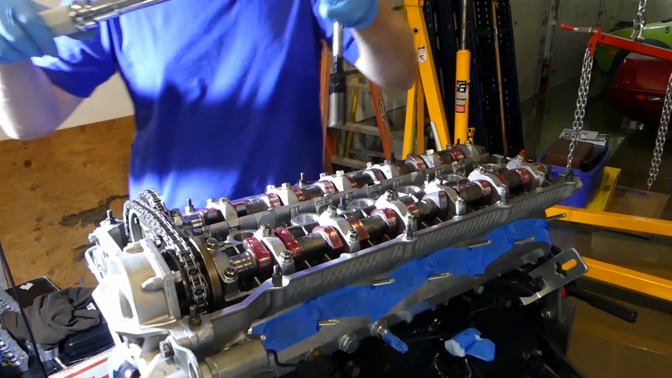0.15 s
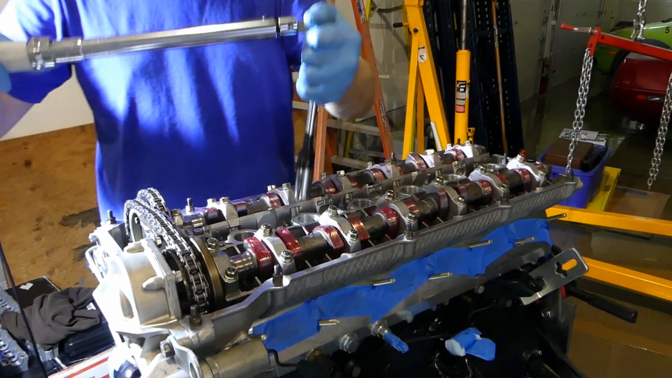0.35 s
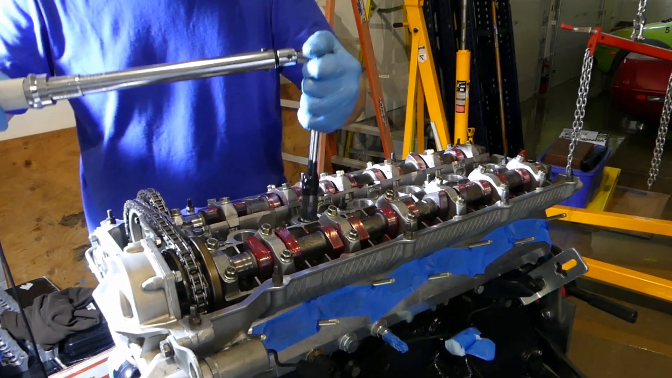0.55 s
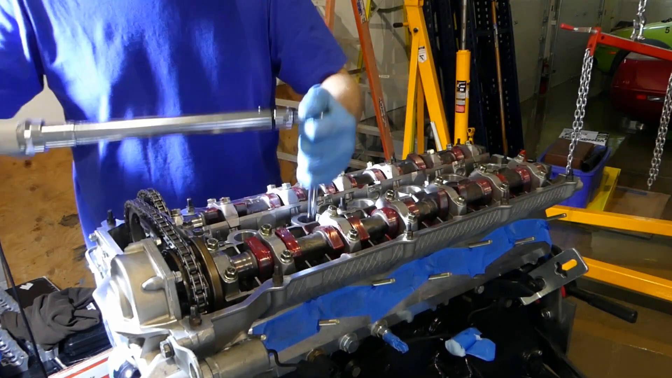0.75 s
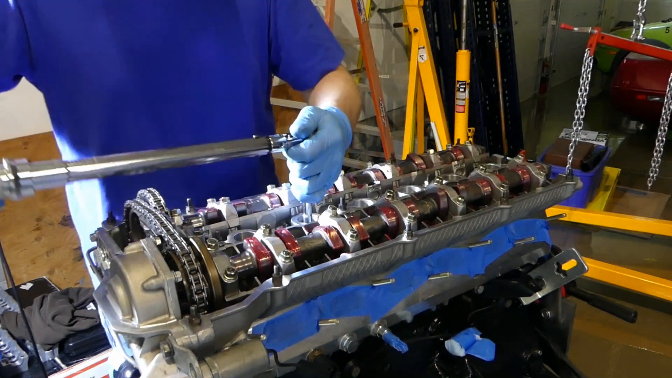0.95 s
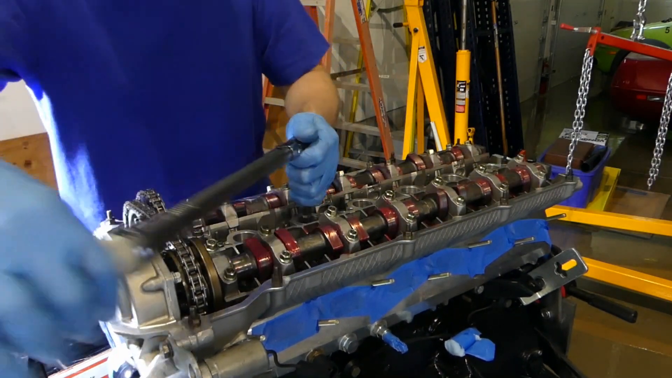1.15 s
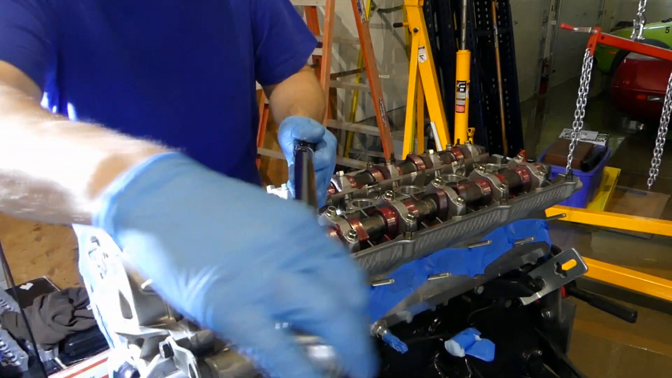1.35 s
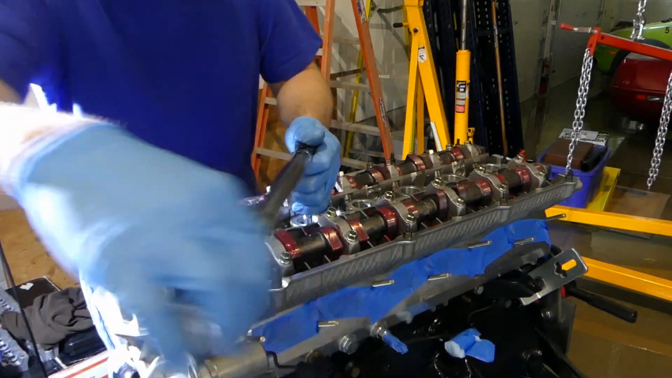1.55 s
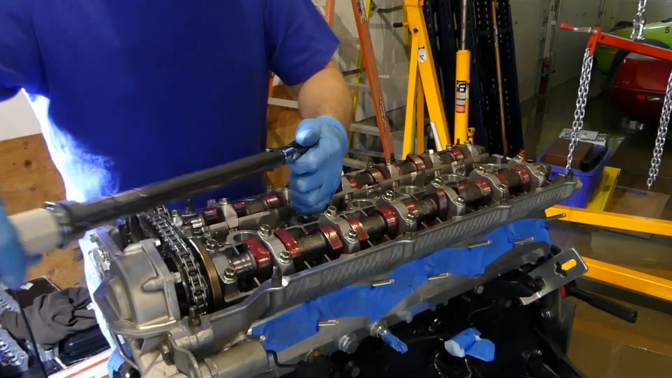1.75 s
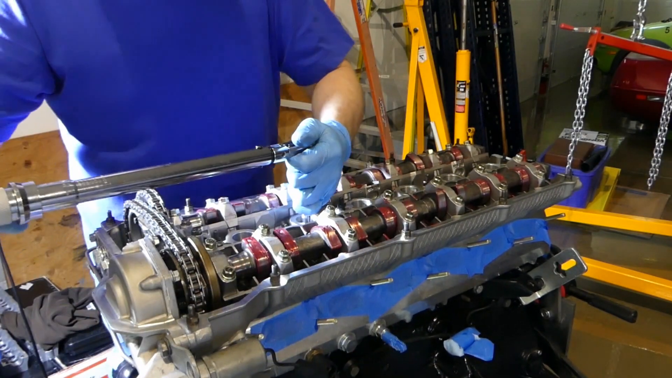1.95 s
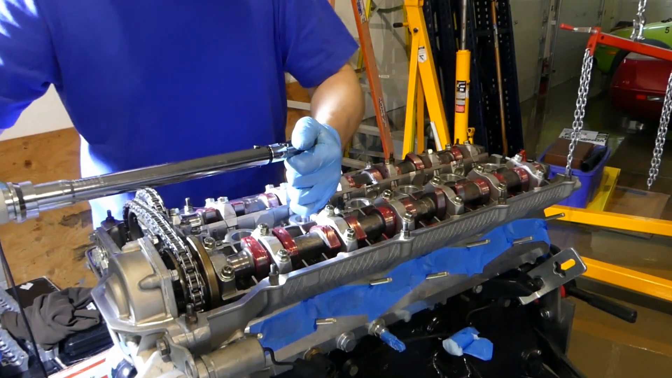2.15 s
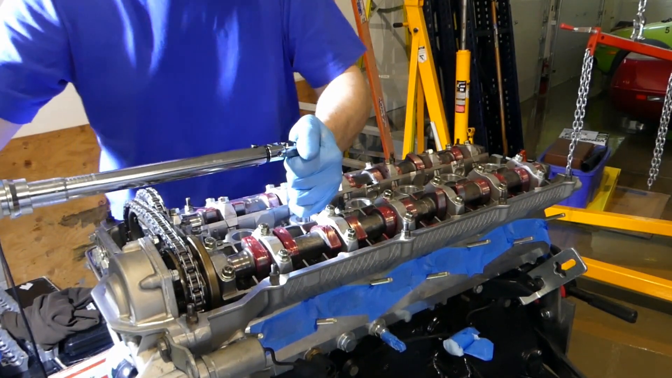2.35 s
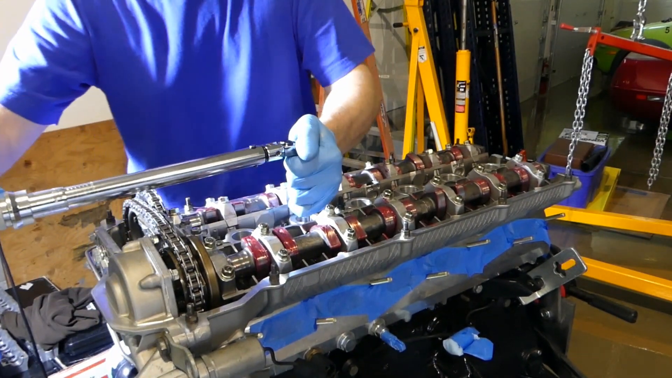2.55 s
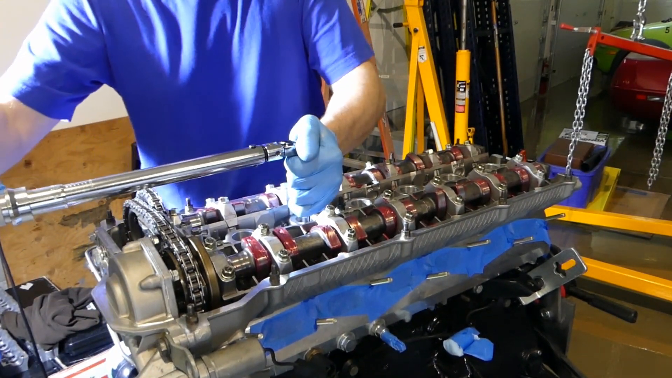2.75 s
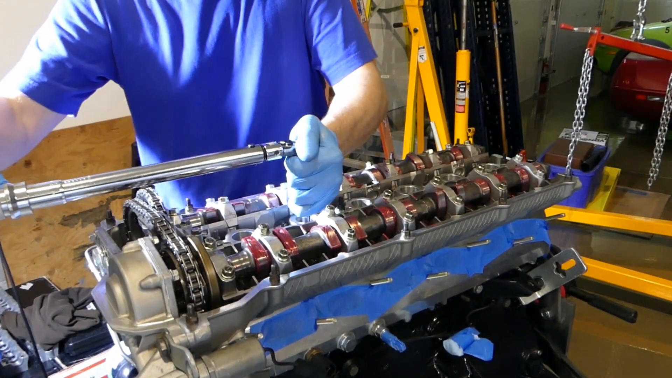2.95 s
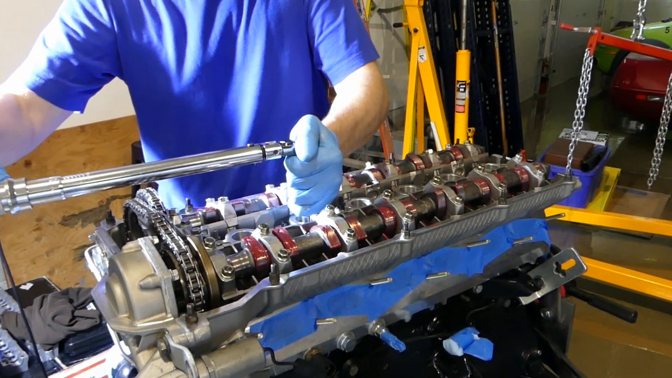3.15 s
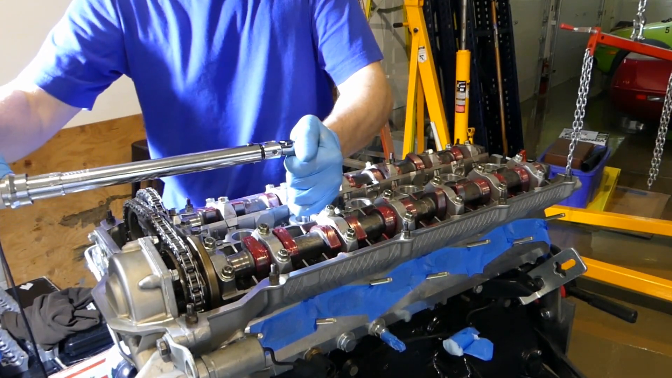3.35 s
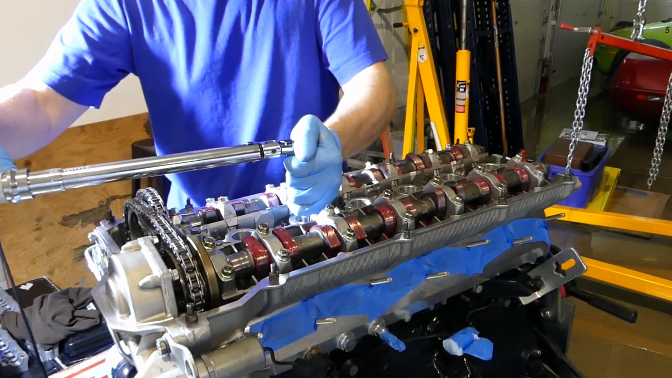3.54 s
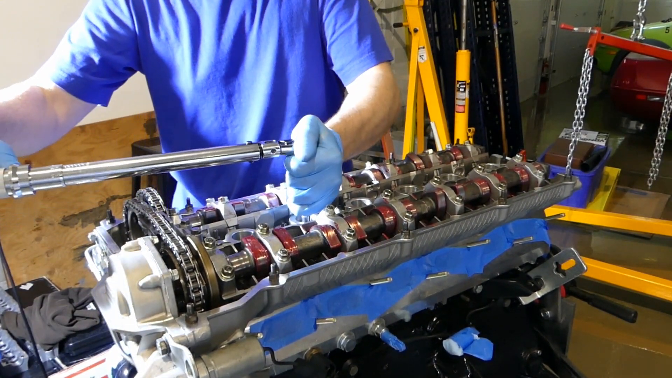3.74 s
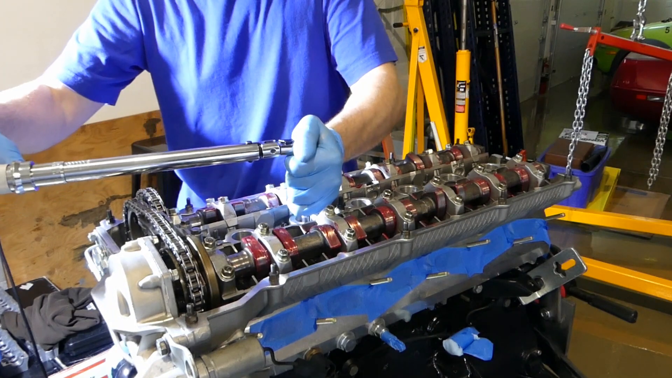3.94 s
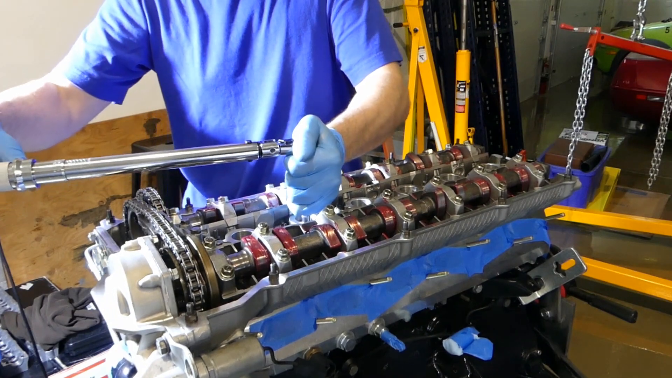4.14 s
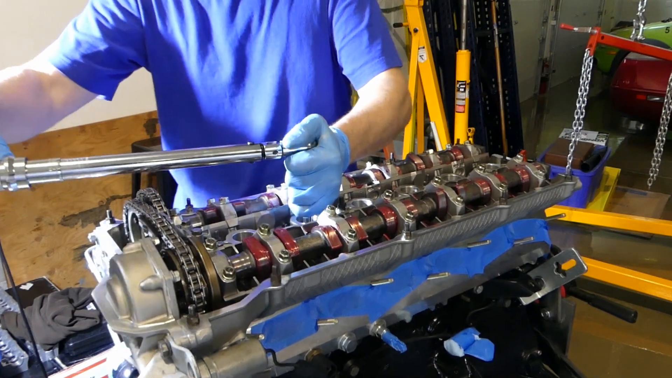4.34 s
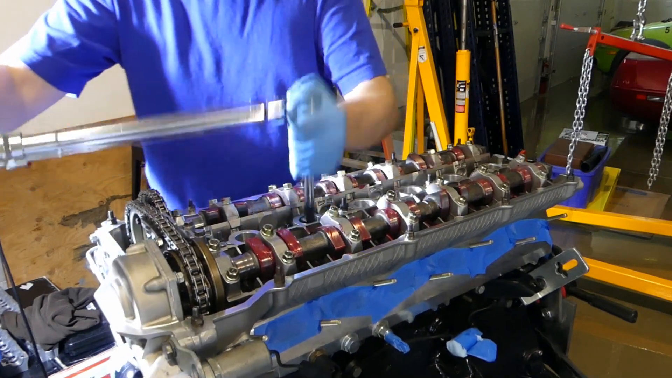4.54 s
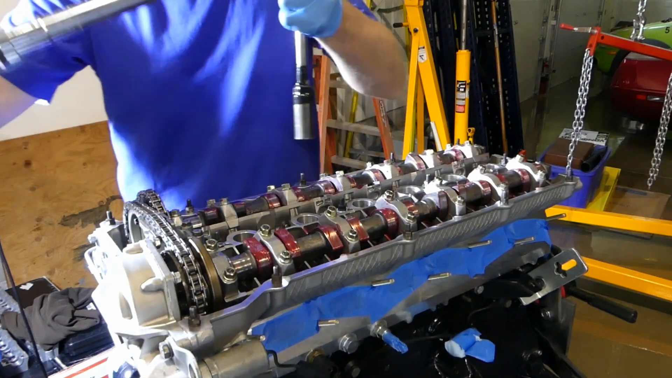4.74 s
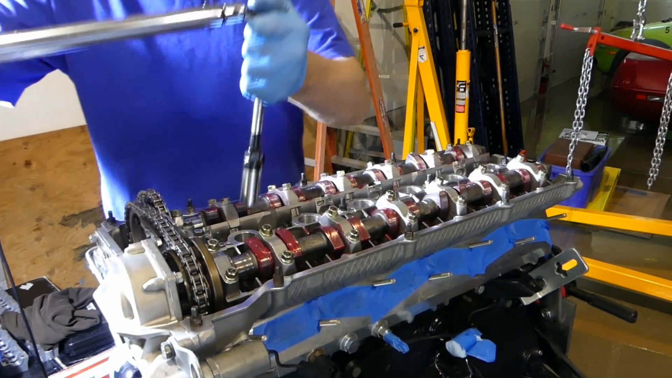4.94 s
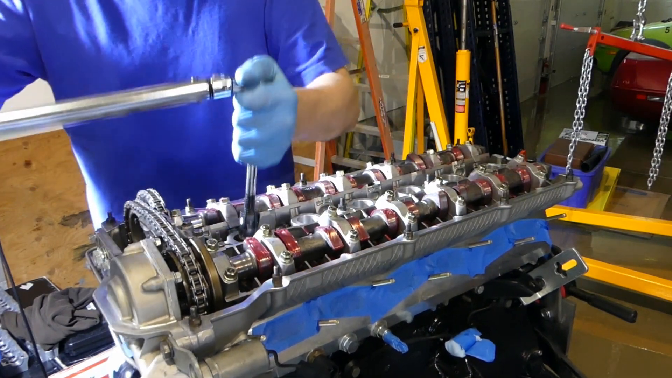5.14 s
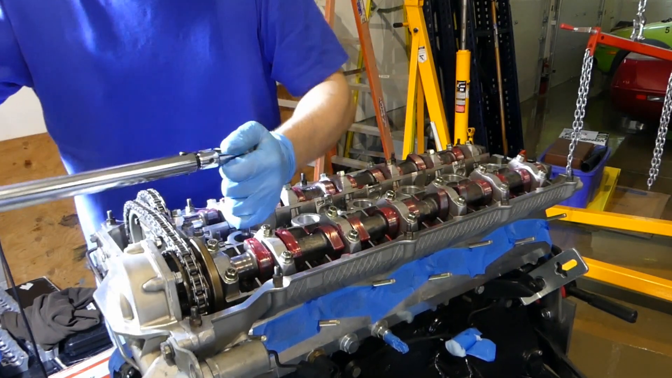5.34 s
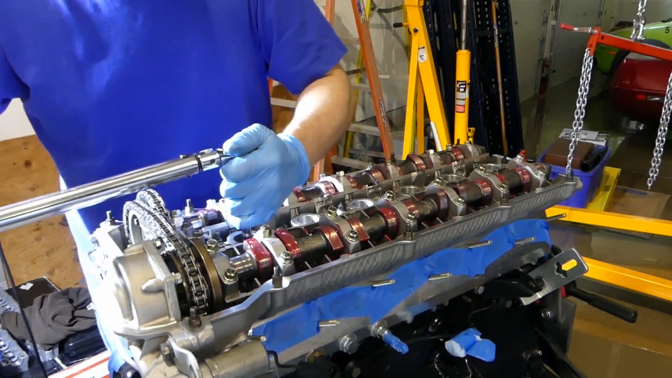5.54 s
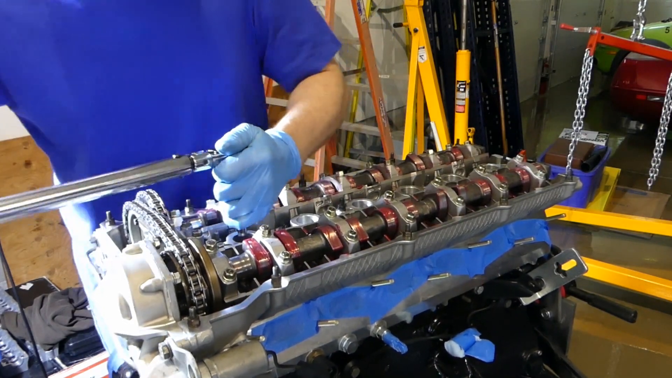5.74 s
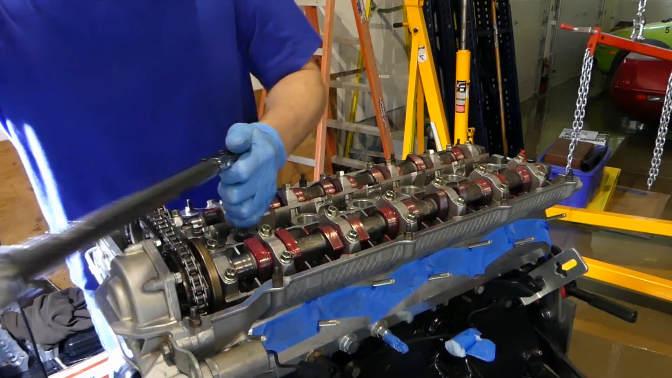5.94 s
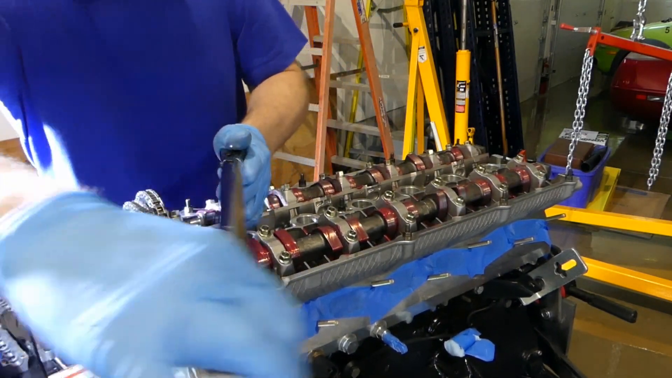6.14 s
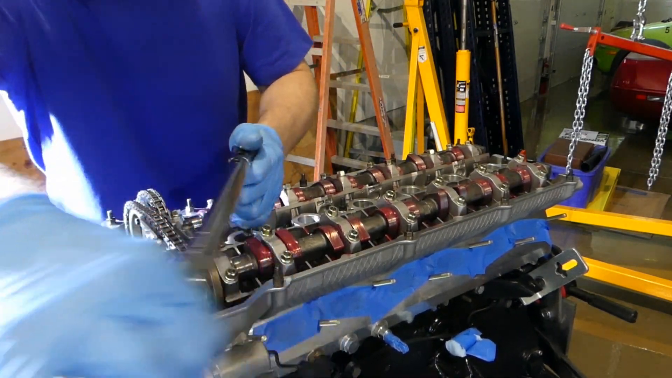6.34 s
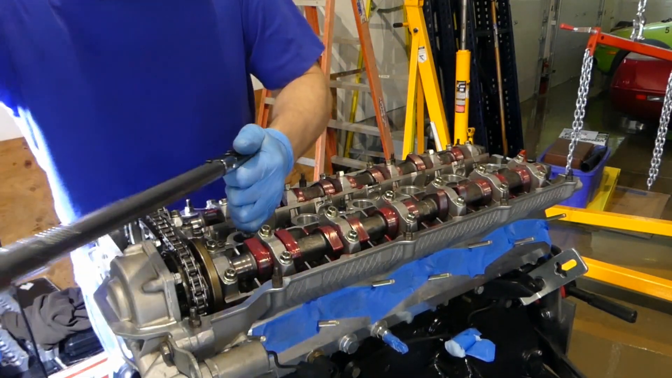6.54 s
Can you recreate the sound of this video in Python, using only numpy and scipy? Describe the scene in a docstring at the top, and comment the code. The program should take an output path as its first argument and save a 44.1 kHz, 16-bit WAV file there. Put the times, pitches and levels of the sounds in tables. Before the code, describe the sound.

A torque wrench ratchets and gives two sharp clicks, its steel socket clanking in an engine, in a reverberant garage.

```python
"""Hard-walled garage: a click-type torque wrench works on spark plugs in a bare engine.
The socket knocks and slides in the plug wells, ringing its steel, the alloy and the air inside.
The ratchet pawl ticks over its teeth; the wrench breaks over and resets, ringing its tube.
Walls answer each blow, the room rings for about a second, and a far machine hums under it all."""
import sys
import numpy as np
from scipy import signal
from scipy.fft import rfft, irfft
from scipy.io import wavfile
from scipy.ndimage import uniform_filter1d

SR = 44100
rng = np.random.default_rng(int(sys.argv[2]) if len(sys.argv) > 2 else 0)


def put_to_file(sound):
    """Save the sound as 16-bit audio at rate SR, in the file named by the first command-line argument."""
    columns = np.atleast_2d(sound).T  # one column per channel
    safe = np.clip(columns, -1, 1)
    whole_steps = np.round(safe * 32767)
    wavfile.write(sys.argv[1], SR, whole_steps.astype(np.int16))


N = 290619


def amp(db):
    """dB to gain."""
    return 10 ** (np.asarray(db) / 20)


def unit_rms(x):
    """Scale to rms 1."""
    return x / np.sqrt(np.mean(x ** 2) + 1e-20)


def curve_at(points, hz):
    """Interpolate a table over log frequency."""
    f, value = np.transpose(points)
    return np.interp(np.log(hz + 1), np.log(f + 1), value)


def add(mix, start_s, sound):
    """Mix in place at start_s."""
    part = mix[:, round(start_s * SR):][:, :sound.shape[1]]
    part += sound[:, :part.shape[1]]


def stroke(start_s, length_s, rise_s, fall_s):
    """Envelope: rise, hold until length_s, exponential decay."""
    t = np.arange(N) / SR - start_s
    return np.clip(t / rise_s, 0, 1) ** 2 * np.exp(-np.maximum(t - length_s, 0) / fall_s)


def noise_band(hz, width_hz):
    """Noise around one pitch, rms 1."""
    f = np.fft.rfftfreq(N, 1 / SR)
    return unit_rms(irfft(rfft(rng.standard_normal(N)) / (1 + (2 * (f - hz) / width_hz) ** 2), N))


def diffuse_spectra(frames, correlation, size):
    """Random short-time spectra, left and right partly correlated."""
    hz = np.fft.rfftfreq(size, 1 / SR)
    a, b, c, d = rng.standard_normal((frames, len(hz), 4)).T
    left, independent = a + 1j * b, c + 1j * d
    rho = np.clip(curve_at(correlation, hz), -1, 1)[:, None]
    return hz, np.array([left, rho * left + np.sqrt(1 - rho ** 2) * independent])


def ring(modes, pitch=1):
    """Minimum-phase modal response; a small body radiates little below its lowest mode."""
    f = abs(np.fft.fftfreq(4096, 1 / SR)) / pitch
    power = sum(amp(2 * db) / (1 + (2 * (f - hz) / width_hz) ** 2) ** 1.2 for hz, width_hz, db in modes)
    power /= 1 + (0.49 * modes[0][0] / (f + 1)) ** 8
    log_gain = np.log(power + 1e-9) / 2
    return np.fft.ifft(np.exp(np.conj(signal.hilbert(log_gain)))).real[:3000]


def blow(body, contact_ms, level_db, impact=0, rise_ms=0.052):
    """Chattering contact drives a body. Rows: direct sound, mean over all directions."""
    t_ms = np.arange(1200) * 1000 / SR
    force = rng.standard_normal(1200) * np.exp(-t_ms / contact_ms) * (1 - np.exp(-t_ms / rise_ms))
    force[10] += impact  # one clean hit
    direct = signal.fftconvolve(force / np.linalg.norm(force), body)[:len(body)]
    energy = SR / 4000 * (contact_ms + 1)  # of a burst of peak 1
    return amp(level_db) * np.sqrt(energy) * np.array([direct, body]) / np.linalg.norm(body)


def socket_knocks():
    """Each knock rings the socket's steel and high ping, the alloy well and the air in it."""
    knocks = [(0.0006, 2.5, -3, -17.5, 2.8), (0.5278, -32.5, -20, -32.5, 17), (0.607, -25, -14.5, -44, 5.7),
              (0.7011, -38, -27.5, -56, 5.7), (0.7677, -21, -28.5, -26.5, 4.3),
              (0.8082, -35, -26, -55, 6.4), (0.831, -36, -33, -33, 8.2), (0.874, -29, -24.5, -29.5, 7.5),
              (0.8866, -28.5, -22, -32.5, 5.4), (1.087, -41, -31, -59, 4.9), (1.2094, -50, -51, -37, 5),
              (1.4306, -50, -40, -45.5, 9.1), (4.5116, -28, -36.5, -33, 4.9),
              (4.5845, -34.5, -30.5, -36, 9.3), (4.6098, -15, -24.5, -35, 11), (4.6261, 7, 2.5, -14, 1.03),
              (4.6463, -5.5, -9.5, -19, 2.8), (5.172, -26.5, -23, -58, 11.5),
              (5.2576, -34, -27.5, -49, 9.1), (5.295, -30, -26, -44, 1.9), (5.3248, -28, -23.5, -35, 2.8),
              (5.3484, -17.5, -20, -35, 4.5), (5.3624, -29, -46, -56, 18),
              (5.3866, -6.5, -9.5, -18.5, 3.14), (6.4141, -41, -62, -65, 3.8)]  # t/s, steel/dB, well/dB, well air/dB, contact/ms
    # modes: f/Hz, width/Hz, level/dB
    steel = [(4355, 840, -2.5), (5420, 930, 1), (6500, 530, 2), (7210, 300, 1), (8230, 800, -5),
             (9750, 1200, -7)]
    well = [(987, 110, -3), (1460, 880, -7.5), (1647, 47, 2.5), (1986, 390, 0), (2130, 76, -3.5),
            (2460, 190, -3.5), (2743, 190, 0.5), (3173, 84, 1), (3480, 700, -7)]
    ping = [(12100, 500, -12), (13400, 900, -14), (14750, 350, 0)]
    well_air = [(607, 85, -4), (692, 90, -3)]
    out = np.zeros((2, N))
    for start_s, steel_db, well_db, air_db, contact_ms in knocks:
        pitch = 1 + .015 * rng.standard_normal()  # seats differently each time
        ping_db = 3 + 1.43 * steel_db  # harder blows are brighter
        bodies = (steel, .7, steel_db), (well, 1.1, well_db), (ping, .5, ping_db), (well_air, 1.1, air_db)
        for modes, contact_scale, db in bodies:
            add(out, start_s, blow(ring(modes, pitch), contact_scale * contact_ms, db))
    return out


def garage_air(base_db=-58.5):
    """Diffuse air noise, drifting in level and in patches of its spectrum."""
    spectrum = [(20, -45), (55, -4.5), (130, -2.5), (250, -2), (420, -0.5), (600, -7), (900, -6),
                (1100, -12), (2800, -20.5), (4500, -23), (6000, -19), (8000, -23.5), (15300, -23),
                (15900, -89)]  # f/Hz, relative density/dB
    correlation = [(60, 0.009), (130, -0.74), (290, -0.78), (640, -0.53), (1410, -0.44), (3100, 0.13),
                   (6820, 0.63), (15000, 0.49)]  # f/Hz, left-right correlation
    drift = [(0, 12), (1.5, 7.5), (2.5, 3.5), (3.9, 1), (5, 9.5), (6.6, 5.5)]  # t/s, level over base/dB
    hz, spectra = diffuse_spectra(N // 256 + 5, correlation, size=1024)
    patches = uniform_filter1d(rng.standard_normal(spectra.shape[1:]), 10, axis=0)
    patches_db = unit_rms(uniform_filter1d(patches, 12, axis=1))
    spectra *= amp(curve_at(spectrum, hz)[:, None] + patches_db)
    air = signal.istft(spectra, nperseg=1024, noverlap=768)[1][:, :N]
    drift_db = np.interp(np.arange(N) / SR, *np.transpose(drift))
    return amp(base_db + drift_db) * unit_rms(air)


def machine_hum():
    """Far machine: narrow noise bands make a wavering hum."""
    lines = [(340.4, 3.1, -73.5), (437, 21, -69.5), (628, 6.1, -94), (657, 3.4, -79.5), (1400, 4, -80.5),
             (2120, 40, -81), (5965, 170, -82.5)]  # f/Hz, width/Hz, rms level/dB
    return sum(amp(db) * noise_band(hz, width_hz) for hz, width_hz, db in lines)


def socket_slides():
    """Sliding friction drives the well's air column and a steel rasp."""
    slides = [(0.697, 0.03, -42, -60, 1.08), (0.754, 0.15, -39.5, -40.5, 1.001),
              (4.719, 0.066, -32.5, -52, 1.295), (5.253, 0.033, -36.5, -35, 1.001),
              (5.312, 0.1, -36, -39, 1.03)]  # t/s, length/s, column/dB, rasp/dB, column pitch ratio
    # modes: f/Hz, width/Hz, level/dB
    column_modes = [(576, 32, 5.5), (768, 180, -11.5), (1007, 200, -8), (1567, 140, 0), (2460, 1200, -6.5)]
    rasp_modes = [(2420, 450, -0.5), (5030, 570, 5), (5900, 700, -13), (14600, 450, -7)]
    grit = rng.standard_normal(N)
    grit *= amp(2 * unit_rms(uniform_filter1d(rng.standard_normal(N), 300)))  # 2 dB rms flicker
    rasp = unit_rms(signal.fftconvolve(grit[::-1], ring(rasp_modes))[:N])
    out = np.zeros(N)
    for start_s, length_s, column_db, rasp_db, pitch in slides:
        column = unit_rms(signal.fftconvolve(grit, ring(column_modes, pitch))[:N])
        envelope = stroke(start_s, length_s, rise_s=0.0069, fall_s=0.016)
        out += envelope * (amp(column_db) * column + amp(rasp_db) * rasp)
    return out


def socket_bumps():
    """Low bumps as the socket seats or comes free."""
    bumps = [(0.889, -46), (4.721, -33.5), (4.812, -43.5), (5.375, -39.5)]  # t/s, level/dB
    envelope = sum(amp(db) * stroke(start_s, .013, rise_s=.013, fall_s=.02) for start_s, db in bumps)
    return envelope * noise_band(hz=345, width_hz=350)


def pawl_ticks():
    """The ratchet pawl rings as it drops over each tooth."""
    ticks = [(1.13, -17, 0.946), (1.194, -20.5, 0.93), (1.264, -19.5, 0.81), (1.342, -19, 1.07),
             (1.479, -20, 0.99), (5.916, -16, 1.07), (5.977, -16.5, 0.86), (6.042, -18, 1.01),
             (6.109, -15, 1), (6.188, -17.5, 1.03)]  # t/s, level/dB, pitch ratio
    modes = [(1460, 150, -5), (1772, 64, 7), (2640, 60, 13.5), (3530, 1100, 6.5), (4280, 240, 4),
             (5100, 2900, 5), (6450, 1080, 9), (9240, 300, 6.5), (9560, 340, 7.5), (11100, 1100, 2.5),
             (13500, 1700, 2.5), (15200, 750, -6)]  # f/Hz, width/Hz, level/dB
    out = np.zeros((2, N))
    for start_s, db, pitch in ticks:
        add(out, start_s, blow(ring(modes, pitch), contact_ms=2.02, level_db=db, impact=0.37, rise_ms=0.6))
    return out


def far_tones():
    """Faint far tones swell and fade."""
    tones = [(1.518, 0.062, 852, 38, -55), (1.586, 0.7, 879, 38, -66), (2.761, 0.083, 900, 70, -55.5),
             (3.0, 0.64, 3077, 110, -72.5)]  # t/s, length/s, f/Hz, width/Hz, level/dB
    t = np.arange(N) / SR
    return sum(amp(db) * noise_band(hz, width_hz) * np.sin(np.pi * np.clip((t - start_s) / length_s, 0, 1))
               for start_s, length_s, hz, width_hz, db in tones)


def wrench_clicks(thump_hz=290, rise_s=0.0012, fall_s=0.0015):
    """Break-over and reset ring the wrench tube and thump through the engine."""
    clicks = [(4.0106, 10.1, -7, 0.56, 0), (4.2855, 5.4, 3, 6.9, 1)]  # t/s, level/dB, thump/dB, direct boost/dB, 0 = break-over or 1 = reset
    tube_modes = [(926, 680, -15, -8), (2300, 900, -3, 16), (3200, 600, -5, 16), (4510, 450, -2, 20),
                  (5500, 1200, -5.5, 12), (6800, 1200, -12, 2), (7900, 700, -7, -2), (9200, 1200, -12, 9),
                  (10900, 450, 9, 12), (12200, 700, 0, 11), (13200, 600, -7, 7), (14400, 500, -3, 9)]  # f/Hz, width/Hz, break-over level/dB, reset level/dB
    t = np.arange(1500) / SR
    thump = np.minimum(t / rise_s, 1) * np.exp(-t / fall_s) * np.cos(2 * np.pi * thump_hz * t)
    out = np.zeros((2, N))
    for start_s, db, thump_db, boost_db, is_reset in clicks:
        tube = ring([(hz, width_hz, levels_db[int(is_reset)]) for hz, width_hz, *levels_db in tube_modes])
        add(out, start_s, blow(tube, contact_ms=1.1, level_db=db, impact=6) * amp([[boost_db], [0]]))
        add(out, start_s, amp(thump_db) * thump * amp([[0], [-10.5]]))  # little reaches the room
    return out


def garage_tail(radiated, level_db=-9, rise_s=0.0041, frames=520):
    """Dense reverberation, dying band by band."""
    correlation = [(100, -0.36), (300, 0.57), (700, 0.91), (1500, 0.56), (3000, 0.72), (7000, 0.9),
                   (15000, 0.41)]  # f/Hz, left-right correlation
    spectrum = [(100, -12), (1000, -0.84), (3100, -6.5), (4600, -4.5), (9000, -3.5), (11000, -8.5),
                (12200, -11), (13400, -5.5), (14800, -2.5), (15600, -31.5), (16300, -25.5)]  # f/Hz, relative level/dB
    decay = [(100, 1.6), (500, 0.89), (1400, 1), (4000, 1.09), (8000, 0.85), (11000, 0.77), (13000, 0.22),
             (16000, 0.29)]  # f/Hz, T60/s
    hz, spectra = diffuse_spectra(frames, correlation, size=512)
    frame_s = np.arange(frames) * 128 / SR
    spectra *= amp(curve_at(spectrum, hz)[:, None] - 60 * frame_s / curve_at(decay, hz)[:, None])
    tail = signal.istft(spectra, nperseg=512, noverlap=384)[1]
    tail *= 1 - np.exp(-(np.arange(tail.shape[1]) / SR / rise_s) ** 2)
    tail *= amp(level_db) / np.linalg.norm(tail[0])
    return signal.fftconvolve(radiated[None], tail, axes=1)[:, :N]


def wall_echoes(direct, band_hz=(4000, 12000)):
    """Rough walls return smeared echoes that keep the treble."""
    echoes = [(3.065, -16.5, -6.5, 1.1), (14.39, -9, -10.5, 3.3), (18.45, -13, -12, 5)]  # delay/ms, left/dB, right/dB, smear/ms
    walls = np.zeros((2, 3000))
    t_ms = np.arange(600) * 1000 / SR
    for delay_ms, left_db, right_db, smear_ms in echoes:
        bursts = rng.standard_normal((3, 600)) * np.exp(-t_ms / smear_ms)
        scatter = bursts[0] + .6 * bursts[1:]  # shared + per channel
        add(walls, delay_ms / 1000, amp([[left_db], [right_db]]) * scatter / np.linalg.norm(scatter[0]))
    walls = signal.sosfilt(signal.butter(1, band_hz, "band", fs=SR, output="sos"), walls)
    return signal.fftconvolve(direct[None], walls, axes=1)[:, :N]


def scene():
    """Tools and their reflections over the background, in stereo."""
    direct, radiated = socket_knocks() + socket_slides() + socket_bumps() + pawl_ticks() + wrench_clicks()
    tools = direct + garage_tail(radiated) + wall_echoes(direct)
    return tools + garage_air() + machine_hum() + far_tones()


def record(dry, bass_cut_hz=80, knee_db=-13, slope=.65, release_s=0.16, ceiling=.93, top_hz=16400):
    """Bass cut, limiter, left-right balance, soft input saturation, band limit."""
    balance = [(60, -2), (240, 1), (950, -2), (3770, -1), (15000, 2.5)]  # f/Hz, left minus right/dB
    thin = signal.sosfilt(signal.butter(2, bass_cut_hz, "high", fs=SR, output="sos"), dry)
    power_db = 10 * np.log10(abs(uniform_filter1d((thin ** 2).mean(0), 40)) + 1e-12)
    wanted_db = np.maximum(slope * (power_db - knee_db), 1e-3)
    age = np.arange(N) / SR / release_s
    cut_db = np.exp(np.maximum.accumulate(np.log(wanted_db) + age) - age)  # exponential release
    limited = thin / amp(uniform_filter1d(cut_db, 20))
    side_db = curve_at(balance, np.fft.rfftfreq(N, 1 / SR)) / 2
    balanced = irfft(rfft(limited) * amp([side_db, -side_db]), N)
    saturated = ceiling * np.tanh(balanced / ceiling)
    lowpass = signal.firwin(511, top_hz, window=("kaiser", 9), fs=SR)
    return signal.oaconvolve(saturated, lowpass[None], "same")


dry = scene()
out = record(dry)
put_to_file(out)
```